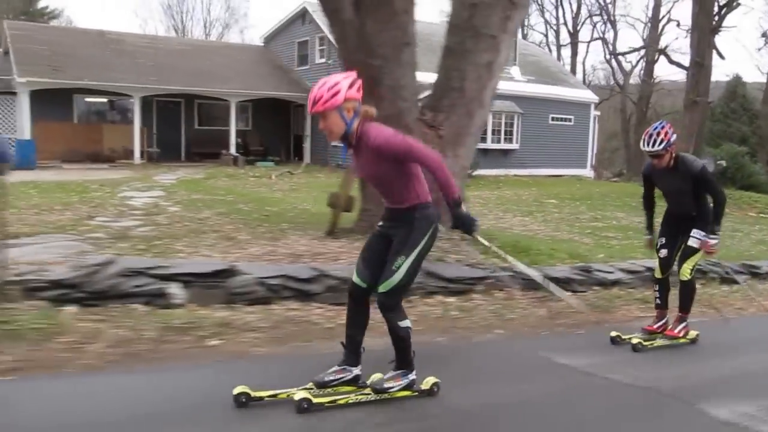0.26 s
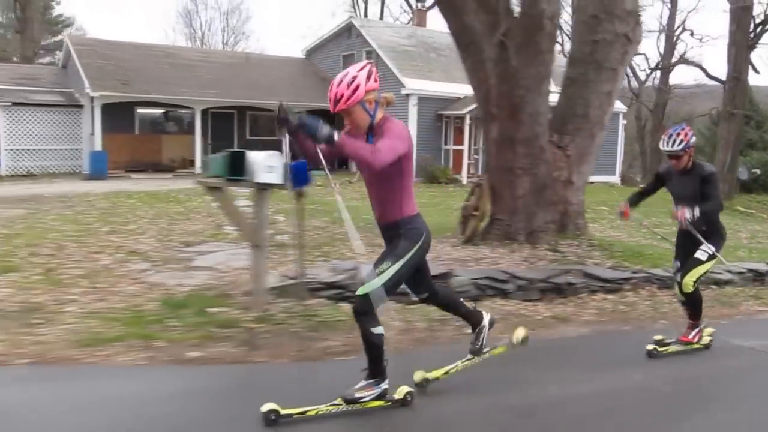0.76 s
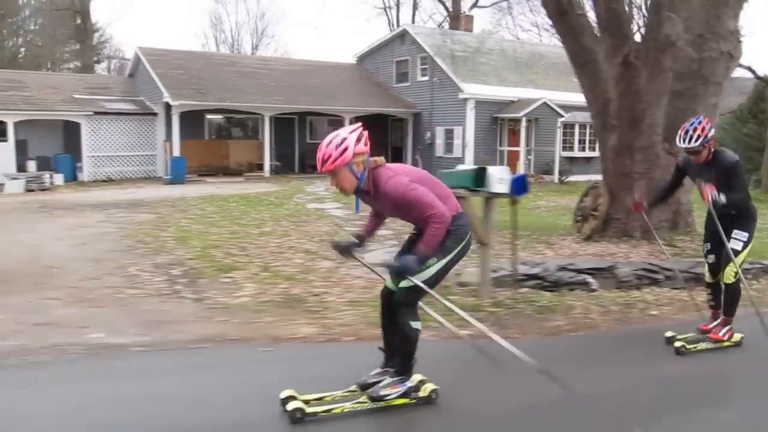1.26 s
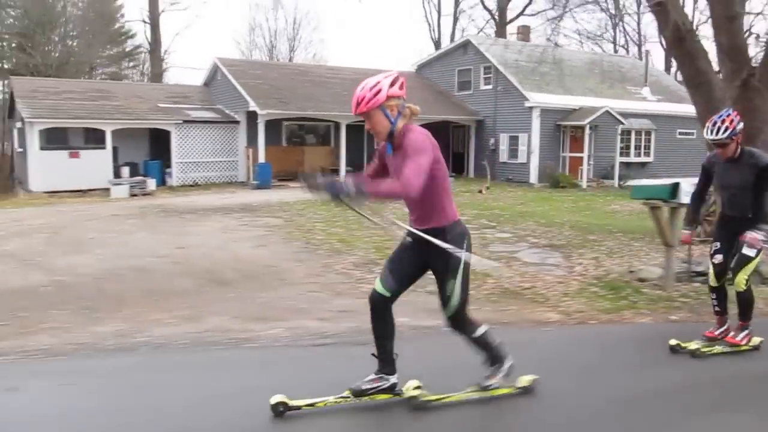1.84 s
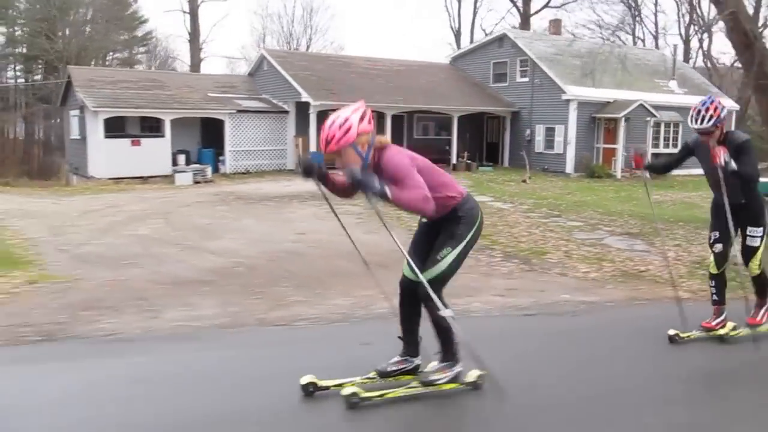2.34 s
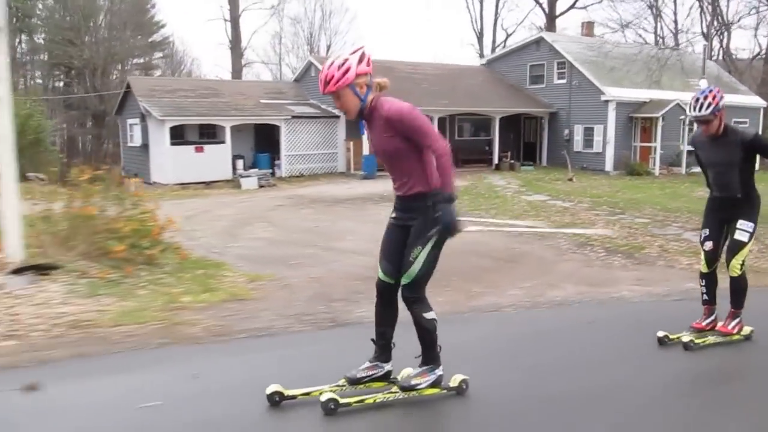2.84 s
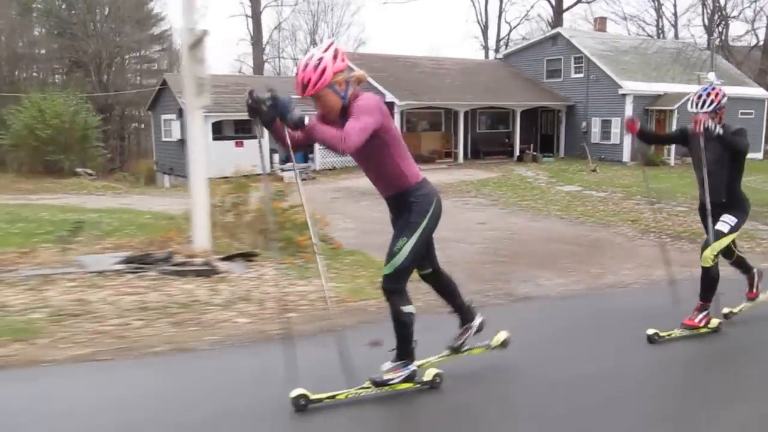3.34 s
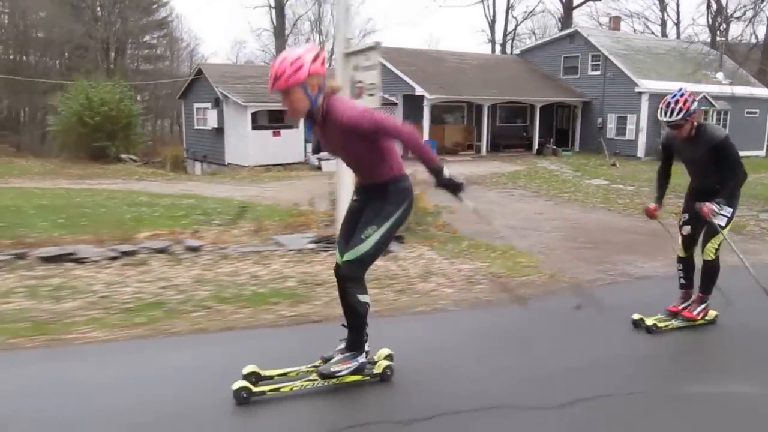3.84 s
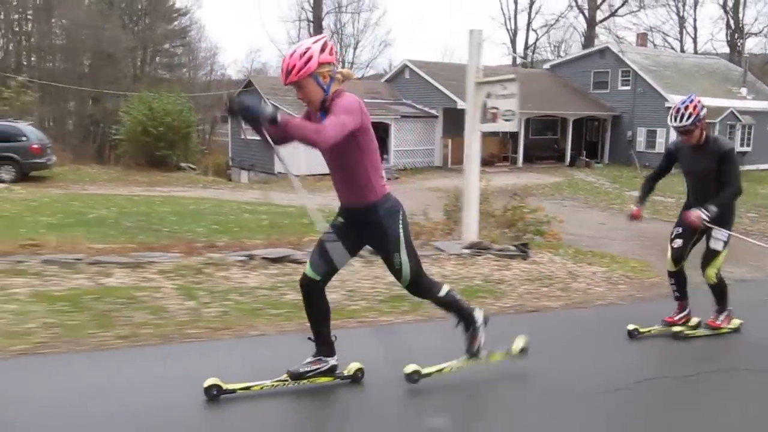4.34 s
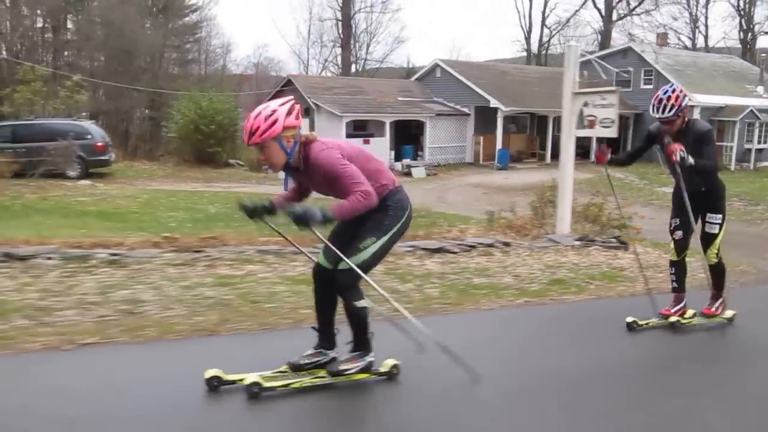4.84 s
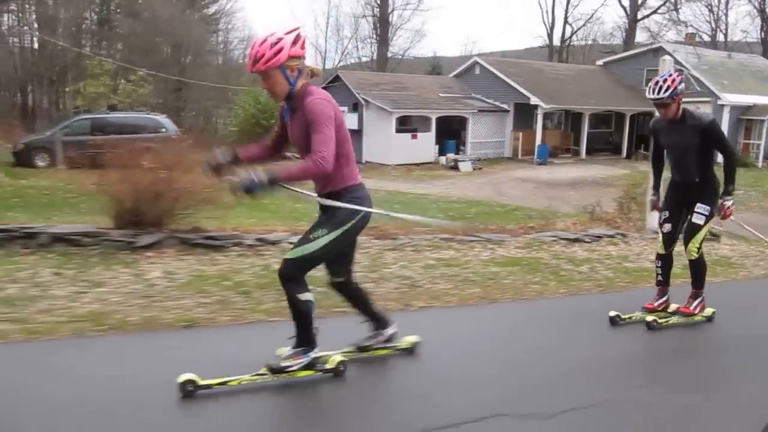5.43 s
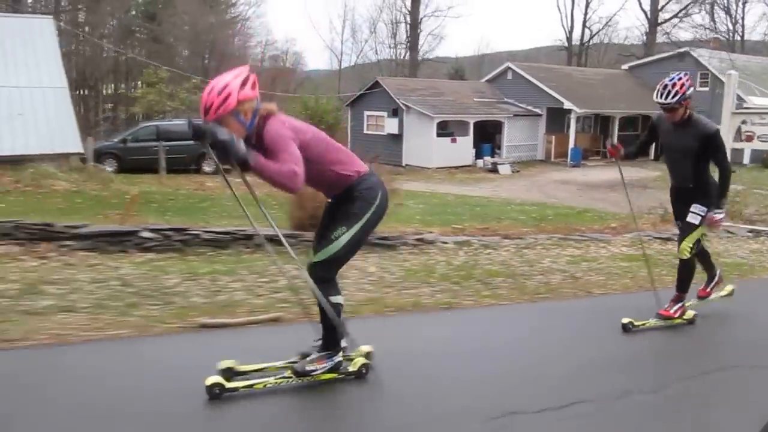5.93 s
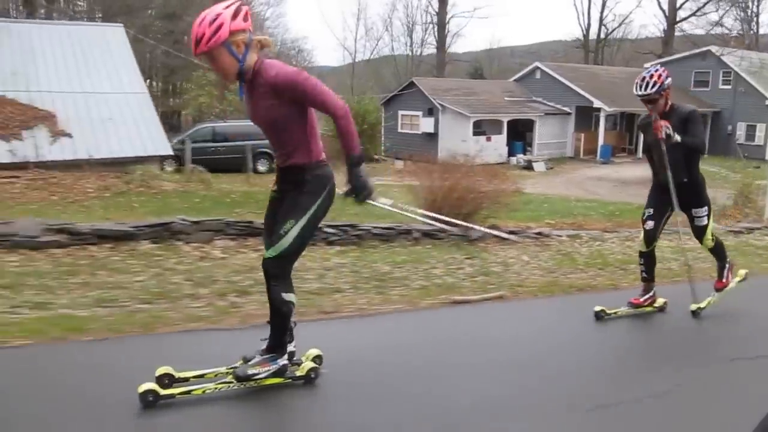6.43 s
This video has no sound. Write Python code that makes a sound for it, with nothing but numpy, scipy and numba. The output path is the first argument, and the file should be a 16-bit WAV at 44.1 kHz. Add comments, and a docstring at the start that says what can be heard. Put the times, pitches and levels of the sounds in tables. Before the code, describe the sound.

Gusts rumble on a microphone moving outdoors alongside two roller skiers. About once a second, pole tips clack on the road, the leader's followed closely by the second skier's, with light binding clicks between. The wind fades after a couple of seconds, leaving the steady drone and wet, gritty hiss of the wheels, which build in the second half. A few low thumps occur, and a little wind returns at the end.

```python
"""Two roller skiers double-pole with a kick along a damp asphalt road, a microphone moving beside them.
Carbide pole tips clack on the road and ring their carbon shafts; skis and bindings click lightly.
The wheels hiss and crunch grit over a steady rolling drone, with a few dull thumps later on.
Gusts buffet the left microphone port and then the right; a limiter ducks after the hardest pole plants."""
import sys
import numpy as np
from scipy import signal
from scipy.fft import rfft, irfft, next_fast_len
from scipy.io import wavfile
from scipy.ndimage import uniform_filter1d, minimum_filter1d
from numba import njit

SR = 44100
rng = np.random.default_rng(int(sys.argv[2]) if len(sys.argv) > 2 else 0)


def digitize_waveform(pressure):
    """Quantize a signal to 16-bit integers and store it at the path in sys.argv[1].

    Rows of a 2-D input are taken as channels; values are limited to [-1, 1].
    """
    field = np.atleast_2d(pressure).T
    bounded = np.clip(field, -1, 1)
    quanta = np.round(bounded * 32767).astype(np.int16)
    wavfile.write(sys.argv[1], SR, quanta)


N = 294588
TIME = np.arange(N) / SR
HISS_REF_DB = -51.5  # tread and grit follow the hiss up and down from here
# the wheels' wet hiss between strokes: t/s, level/dB
WET_HISS = [(0, -59.5), (1.6, -68), (2.4, -60.5), (2.75, -58), (3.15, -59.5), (3.6, -54.5), (4.1, -56),
            (4.4, -48), (5.0, -47.5), (5.55, -51), (6.35, -49.5), (6.68, -54.5)]


def undb(db):
    """Decibels to gain."""
    return 10 ** (np.asarray(db) / 20)


def unit(x):
    """Scale to rms 1."""
    return x / np.sqrt(np.mean(x ** 2))


def curve(rows):
    """Breakpoints joined by straight lines in time."""
    return np.interp(TIME, *np.transpose(rows))


def colour(x, points, size=4096):
    """Minimum-phase EQ with unit power gain, drawn through points of f/Hz, level/dB."""
    hz, db = np.transpose(points)
    bin_hz = np.arange(size // 2 + 1) * SR / size
    gain = unit(undb(np.interp(np.log(bin_hz + 1), np.log(hz), db)))
    cepstrum = irfft(np.log(gain))
    cepstrum[1:size // 2] *= 2
    cepstrum[size // 2 + 1:] = 0
    response = irfft(np.exp(rfft(cepstrum)))
    return signal.fftconvolve(x, response[None], axes=-1)[:, :x.shape[-1]]


def walk(rate):
    """Random drift at rms 1: levels held 1 / rate s and slewed twice."""
    hold = max(int(SR / rate), 1)
    steps = rng.standard_normal(N // 64)[np.arange(N) // max(hold, 64) % (N // 64)]
    return unit(uniform_filter1d(uniform_filter1d(steps, hold), hold))


def stereo_noise(likeness, size=N):
    """White noise on two channels with the given correlation."""
    mid, side = rng.standard_normal((2, size))
    return np.sqrt((1 + likeness) / 2) * mid + np.sqrt((1 - likeness) / 2) * np.array([side, -side])


@njit
def lowpass(x, hz, damping):
    """State-variable low-pass whose corner moves every sample."""
    y, band_state, low_state = np.empty(len(x)), 0., 0.
    for i in range(len(x)):
        g = np.tan(np.pi * hz[i] / SR)
        band = (band_state + g * (x[i] - low_state)) / (1 + g * (g + damping))
        y[i] = low_state + g * band
        band_state, low_state = 2 * band - band_state, 2 * y[i] - low_state
    return y


def from_right(x, lag_samples=1.7):
    """Sound from the road reaches the right port just before the left."""
    size = next_fast_len(N + 64)
    delay = np.exp(-2j * np.pi * np.fft.rfftfreq(size) * lag_samples)
    return np.array([irfft(rfft(x[0], size) * delay, size)[:N], x[1]])


def swell(after_s, half_s, db, stride_s=1.211, plant_s=0.9):
    """A smooth rise in dB on every stride, timed from about the leader's pole plant."""
    away = (TIME - plant_s - after_s + stride_s / 2) % stride_s - stride_s / 2
    return db * np.exp(-(away / half_s) ** 2)


def wheels(tread_db=-47.5, tread_follows=0.45):
    """Rubber rumbles on coarse asphalt, peels off its damp film and crushes grit, more on push and kick."""
    # tyre tread on asphalt: f/Hz, level/dB
    tread_eq = [(500, -5.5), (1300, 0), (2300, 3), (3000, 1), (4800, 0.5), (6500, -3), (9000, -17),
                (12000, -15), (16000, -53)]
    # sizzle of the water film: f/Hz, level/dB
    hiss_eq = [(4000, -19), (7000, -11), (9500, 5.5), (11000, 9.5), (13000, 3), (15300, -5), (16300, -29)]
    snaps = grit()
    push = swell(after_s=0.36, half_s=0.24, db=4.8)
    kick = swell(after_s=-0.2, half_s=0.077, db=5.4)
    hiss_db = curve(WET_HISS) + push + kick
    load_db = tread_follows * (hiss_db - HISS_REF_DB)
    tread = stereo_noise(0.2) * undb(tread_db + load_db + 0.43 * walk(24.89))
    hiss = stereo_noise(0.028) * undb(hiss_db + 2.8 * walk(28))
    return colour(tread + snaps / 2, tread_eq) + from_right(colour(hiss + snaps, hiss_eq))


def grit(base_per_s=14, grain_db=-42, follows=.4, decay_s=.0015):
    """Stray grains snap under the wheels in loose clusters, most around the kick, louder with the hiss."""
    density = undb(6 * np.tanh(walk(7)) + swell(after_s=-.2, half_s=.15, db=6))
    hits = rng.random(N) < base_per_s / SR * density
    level_db = grain_db + follows * (curve(WET_HISS) - HISS_REF_DB)
    strength = undb(level_db + 3.0 * np.minimum(rng.exponential(size=N), 3))
    envelope = signal.lfilter([1], [1, -np.exp(-1 / (decay_s * SR))], hits * strength)
    return stereo_noise(0.08) * envelope


def drone(gain_db=-1, pan_db=0.57):
    """A low, nearly mono bed of rolling noise that swells just before the leader's plants."""
    # broad resonances of the rolling: f/Hz, level/dB
    drone_eq = [(25, -4.5), (50, 1.5), (130, 2), (215, -5.5), (330, 0), (450, -1), (570, -9), (690, -5),
                (790, -10), (990, -3.5), (1400, -13.5), (1660, -7), (2100, -21.5), (4000, -38.5)]
    # fader ride of the travel along the road: t/s, level/dB
    travel = [(0, -48.5), (2.4, -44.5), (3.7, -41.5), (4.3, -42.5), (5.1, -41), (6.68, -41.5)]
    level_db = gain_db + curve(travel) + swell(after_s=-0.067, half_s=0.21, db=2.5)
    sound = colour(stereo_noise(0.95), drone_eq) * undb(level_db + 1.35 * walk(10))
    return sound * undb([[pan_db], [-pan_db]])


def hum(waver=.005, flutter_db=3):
    """A few faint tones waver in the drone."""
    # steady partials of the drone: f/Hz, level/dB
    partials = [(328.4, -58.5), (1055, -59), (1340, -58.5)]
    out = np.zeros(N)
    for hz, db in partials:
        level = undb(db + flutter_db * walk(6.5))
        pitch_hz = hz * (1 + waver * walk(8))
        out += level * np.sin(2 * np.pi * np.cumsum(pitch_hz) / SR)
    return out


def gust_power(lee, attack_s=0.0034, release_s=0.002, sag_db=5.5, crossing_s=.018):
    """Gusts hit, sag and drop away; from windward (lee 0) to sheltered (1) they come later, most weaker."""
    # gusts: t/s, length/s, windward level/dB, sheltered side relative to it/dB
    gust_cues = [(0, 0.055, -19, -7), (0.074, 0.033, -20.5, -5.5), (0.168, 0.0095, -15, -2),
                 (0.182, 0.045, -18.5, -7), (0.268, 0.12, -19.5, -2.5), (0.283, 0.0085, -8.5, -14),
                 (0.503, 0.15, -18.5, -2), (0.689, 0.039, -25.5, 3.5), (0.764, 0.038, -15.5, -5.5),
                 (0.825, 0.049, -18.5, -10), (0.879, 0.09, -17, -7), (0.998, 0.11, -20.5, -9),
                 (1.221, .03, -18.5, -3), (1.295, 0.019, -20, -5), (1.392, 0.039, -17, -5),
                 (1.464, 0.05, -21.5, -15), (1.534, 0.044, -24, -12), (1.622, 0.018, -15.5, -10.5),
                 (1.699, 0.017, -22, -19), (1.759, .11, -20.5, -6.5), (1.94, 0.064, -20.5, -26),
                 (2.023, 0.017, -21.5, -22), (2.303, 0.012, -24, -27), (2.673, .014, -20, -14),
                 (6.223, 0.021, -30.5, 1.5), (6.365, 0.049, -25.5, 3.5), (6.441, 0.042, -29.5, -1)]
    power = np.zeros(N)
    for s, length, db, lee_db in gust_cues:
        age = TIME - s - lee * crossing_s
        near = (age > -.05) & (age < length + .1)
        age = age[near]
        gate = (1 + np.tanh(age / attack_s)) * (1 - np.tanh((age - length) / release_s)) / 4
        power[near] += (gate * undb(db + lee * lee_db - sag_db * np.clip(age / length, 0, 1))) ** 2
    return power


def buffet(lee, base_hz, low_cut_hz, gain_db, ref_db=-20, brighten=0.34, suction=0.27, damping=1.147):
    """Turbulence at one port: stronger eddies are brighter, their pressure dips sharper than the crests."""
    # breeze stirring at the ports between gusts: t/s, level/dB
    breeze_bed = [(0, -33), (.9, -34), (1.2, -39), (1.5, -37.5), (2.23, -36), (2.55, -54.5), (5.9, -68),
                  (6.4, -45.5), (6.68, -51)]
    breeze_db = curve(breeze_bed)
    power = undb(breeze_db + 6 * np.tanh(walk(45))) ** 2 + gust_power(lee)
    force = np.sqrt(power) * undb(3 * walk(380))  # fast flutter
    # eddies are carried past more slowly, and so sound duller, when the breeze drops
    carried = undb(0.11 * (breeze_db + 32.5))
    corner_hz = np.clip(base_hz * carried * (force / undb(ref_db)) ** brighten, 150, 5000)
    swirl = lowpass(lowpass(rng.standard_normal(N), corner_hz, damping), corner_hz, damping)
    swirl /= np.sqrt(uniform_filter1d(swirl ** 2, size=600))
    pressure = force * (swirl - suction * (swirl ** 2 - 1))
    low_cut = signal.butter(1, low_cut_hz, "high", fs=SR, output="sos")
    return undb(gain_db) * signal.sosfilt(low_cut, pressure)


def contacts(lift_after_s=.484, lift_gap_s=0.0048, lift_over_hiss_db=14.5, lift_tick_db=-1):
    """Cue list of light clicks, pole plants and lift-offs: t/s, clack/dB, tick over clack/dB."""
    # light clicks of skis and bindings: t/s, clack/dB, tick over clack/dB
    binding_clicks = [(0.2846, -36.5, -34), (1.766, -43, 1.5), (3.1023, -37.5, 2), (3.2325, -43, 4.5),
                      (4.1872, -36, -2), (5.5064, -40, 9.5), (6.5787, -37.5, 10.5), (6.634, -35, -17)]
    # double-pole plants: t/s, clack/dB, tick over clack/dB, second tip's lag/s,
    # its clack over the first/dB, its tick over its clack/dB, skier (0 leader, 1 follower)
    pole_plants = [(0.9326, -17.5, -14, .0063, -10, 7, 0), (1.0735, -14.5, -18, .022, -18, -15, 1),
                   (2.1296, -28, 7.5, .0132, 4.5, 0.5, 0), (2.2522, -24, -15, .015, -3, -11, 1),
                   (3.3257, -17, -2.5, .0066, -2.5, 4, 0), (3.5388, -13, -36, 0.0036, -9, -29, 1),
                   (4.5588, -20, 0, .0026, 5, 4.5, 0), (4.757, -6, -8, .003, -31, -8, 1),
                   (5.7558, -19.5, 10, .0026, 4.5, -23, 0), (5.862, -3, -27, .004, -24, -12, 1),
                   (6.4101, -16, -15, .007, -12, -10, 1)]
    rows = list(binding_clicks)
    for s, db, tick_db, gap, second_db, second_tick_db, skier in pole_plants:
        rows += [(s, db, tick_db), (s + gap, db + second_db, second_tick_db)]
        if skier == 0:  # the leader's tips scuff the road in turn as they lift after the push
            lift = s + lift_after_s
            lift_db = np.interp(lift, *np.transpose(WET_HISS)) + lift_over_hiss_db
            rows += [(lift, lift_db, lift_tick_db), (lift + lift_gap_s, lift_db, lift_tick_db)]
    return rows


def strikes(levels_db, eq, contact_s, ring_db, ring_t60, tail_db, tail_t60, bounce_s=0.00271):
    """Each contact is a hard crack, a softer bounce, then a short noisy ring and a faint tail."""
    out, size = np.zeros((2, N + SR)), SR // 5
    t = np.arange(size) / SR
    contact = np.exp(-(t / contact_s - 1) ** 2)
    ring = undb(ring_db - 60 * t / ring_t60) + undb(tail_db - 60 * t / tail_t60)
    for (s, *_), db in zip(contacts(), levels_db):
        bounce = undb(-14) * np.exp(-((t - bounce_s * rng.uniform(0.99, 1.31)) / contact_s) ** 2)
        grain = stereo_noise(0.73, size)
        crack = colour(grain * contact, eq)
        # the energy of the contact is set by the blow, whatever stones it meets
        crack *= np.sqrt(np.sum(contact ** 2) / np.sum(crack ** 2, axis=1, keepdims=True))
        start = int(s * SR)
        out[:, start:start + size] += undb(db) * (crack + colour(grain * (bounce + ring), eq))
    return from_right(out[:, :N])


def shaft_ring(ring_db=-15, ring_t60=0.0091):
    """Every blow rings the shaft's modes, whose pitch and balance vary from hit to hit."""
    # bending modes of the carbon shaft: f/Hz, level/dB
    shaft_modes = [(3250, 15.5), (3790, 5), (4400, -6), (5600, -2.5)]
    out, size = np.zeros((2, N + SR)), SR // 6
    t = np.arange(size) / SR
    hz, mode_db = np.transpose(shaft_modes)[:, :, None]
    for s, db, _ in contacts():
        share, detune = rng.standard_normal((2, len(shaft_modes), 1))
        modes = undb(mode_db + 3 * share) * np.sin(2 * np.pi * hz * (1 + .045 * detune) * t)
        start = int(s * SR)
        out[:, start:start + size] += undb(db + ring_db - 60 * t / ring_t60) * modes.sum(axis=0)
    return from_right(out[:, :N])


def poles(clack_db=5.5, tick_db=8, pan_db=1.5):
    """The shaft gives a hollow clack and a short ring, the carbide point a bright tick."""
    # hollow body of the shaft: f/Hz, level/dB
    clack_eq = [(150, -34), (700, -19.5), (1400, -4.5), (2400, -1.5), (3300, 2.5), (4200, 6.5), (6000, 3.5),
                (7500, -5), (10000, -10), (16000, -17)]
    # bright edge of carbide on stone: f/Hz, level/dB
    tick_eq = [(3000, -60), (7000, -11), (9800, 3.5), (11500, 1.5), (13500, -8.5), (16000, -21)]
    _, blow_db, bright_db = np.transpose(contacts())
    clack = strikes(blow_db + clack_db, clack_eq, contact_s=0.0002,
                    ring_db=-6.0, ring_t60=0.026, tail_db=-28.5, tail_t60=0.11)
    tick = strikes(blow_db + bright_db + tick_db, tick_eq, contact_s=0.00024,
                   ring_db=-7.5, ring_t60=0.016, tail_db=-51, tail_t60=0.072)
    return (clack + tick + shaft_ring()) * undb([[-pan_db], [pan_db]])


def thumps(right_db=-10):
    """Dull low thumps, mostly on the left: slow pressure dips of a few cycles at most."""
    # pressure dips: t/s, f/Hz, half-length/s, peak level/dB
    thump_cues = [(3.947, 149, 0.0061, -26), (4.39, 110, 0.015, -34), (4.444, 105, 0.0031, -25),
                  (6.526, 144, 0.0033, -16)]
    wave = np.zeros(N)
    for s, hz, half_s, db in thump_cues:
        age = TIME - s
        wave -= undb(db) * np.exp(-(age / half_s) ** 2) * np.cos(2 * np.pi * hz * age)
    return wave * undb([[0], [right_db]])


def scene():
    """Poles and wheels over the drone, with the left port facing into the wind."""
    wind = np.array([buffet(lee=0, base_hz=1311, low_cut_hz=203, gain_db=2.6),
                     buffet(lee=0.92, base_hz=954, low_cut_hz=96, gain_db=0.2)])
    return poles() + wheels() + drone() + wind + thumps() + hum()


@njit
def limiter_cut(peak, ceiling, release):
    """Gain reduction in nepers: jumps up with each overload and relaxes slowly."""
    cut, held = np.zeros(len(peak)), 0.
    for i in range(len(peak)):
        held = max(held * release, np.log(max(peak[i] / ceiling, 1.)))
        cut[i] = held
    return cut


def record(dry, notch_hz=8230, notch_width_hz=1500, ceiling_db=2, release_s=0.18, top_hz=15800):
    """The ports cancel one treble band; a limiter holds the peaks, the rest clips; the top is cut."""
    sound = signal.lfilter(*signal.iirnotch(notch_hz, notch_hz / notch_width_hz, fs=SR), dry)
    cut = limiter_cut(np.abs(sound).max(axis=0), float(undb(ceiling_db)), np.exp(-1 / (release_s * SR)))
    gain = uniform_filter1d(minimum_filter1d(np.exp(-cut), size=33), size=33)  # look-ahead
    high_cut = signal.ellip(8, .2, 70, top_hz, fs=SR, output="sos")
    return signal.sosfilt(high_cut, np.clip(sound * gain, -.95, .95))


dry = scene()
out = record(dry)
digitize_waveform(out)
```